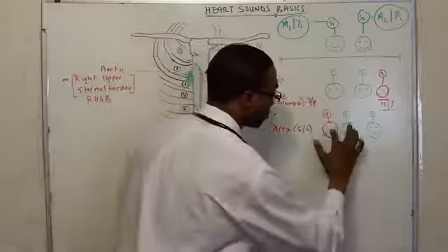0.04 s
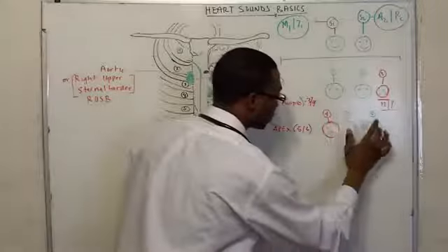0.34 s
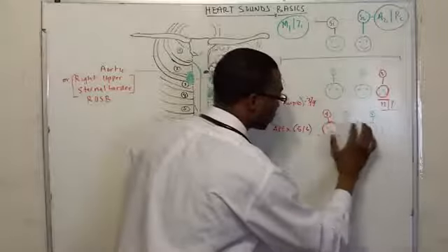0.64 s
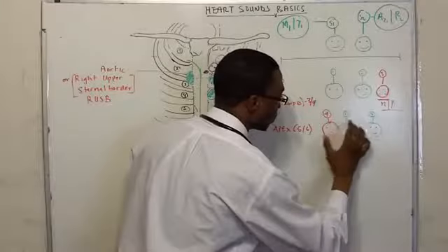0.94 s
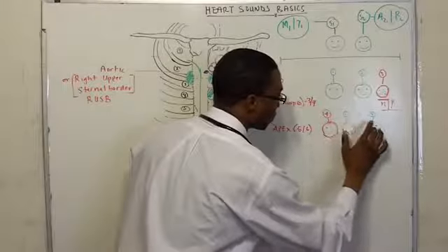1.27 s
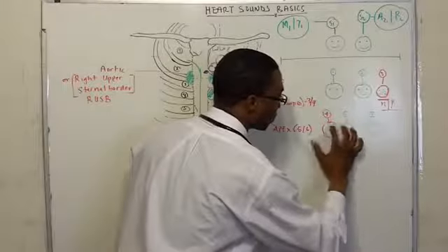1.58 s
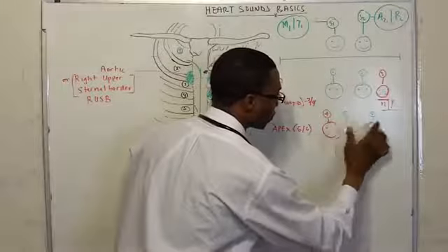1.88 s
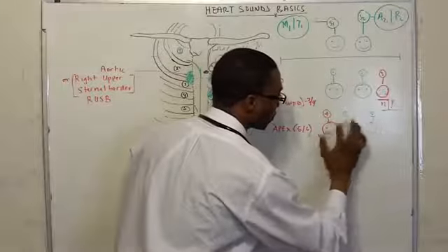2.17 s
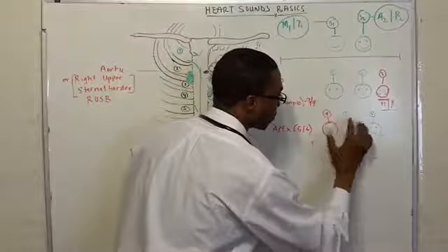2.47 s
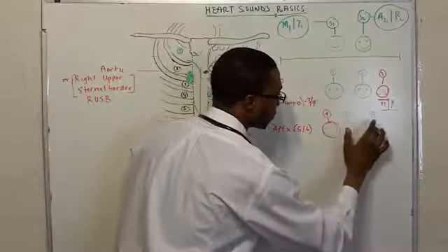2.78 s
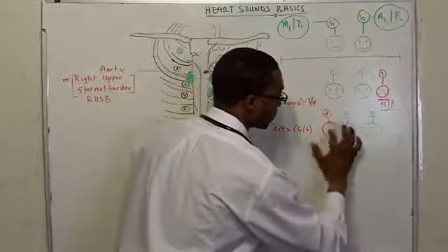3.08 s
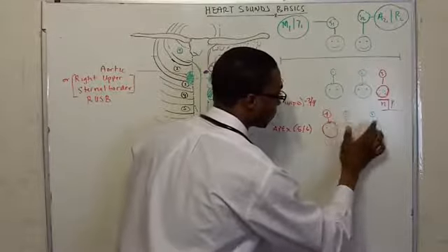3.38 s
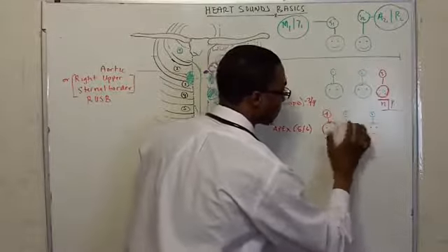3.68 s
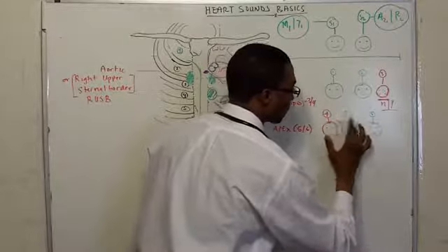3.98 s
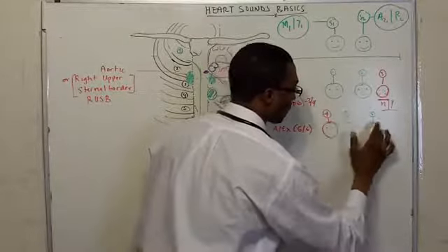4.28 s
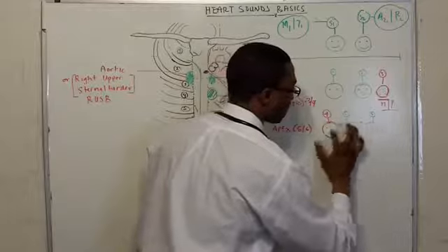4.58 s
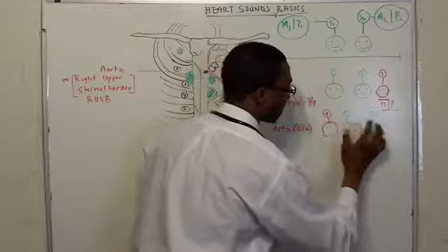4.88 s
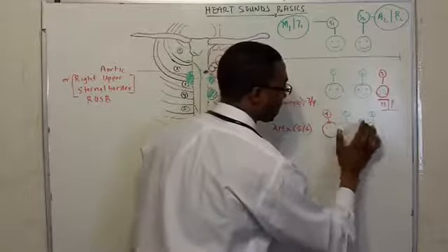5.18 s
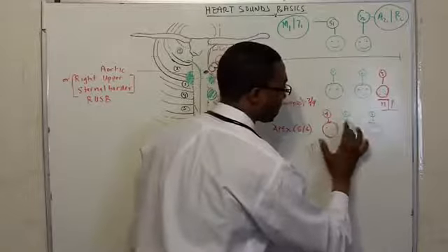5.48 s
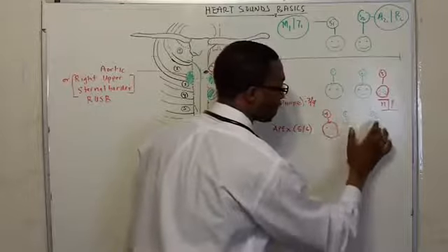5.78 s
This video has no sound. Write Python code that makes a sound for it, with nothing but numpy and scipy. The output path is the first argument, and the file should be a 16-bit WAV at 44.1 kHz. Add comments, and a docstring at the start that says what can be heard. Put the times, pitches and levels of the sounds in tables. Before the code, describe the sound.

In a small room, a hand taps a whiteboard in a galloping rhythm: two fingertips in quick succession, a short gap, then a harder third tap. The figure comes eight times at an even pace. Each tap is a thud with a dry clack from the panel and a brief room ring. Soft ventilation, electrical hum and microphone hiss run underneath, and the tapping sits a little to the left.

```python
"""First comes a small room's background, which lasts throughout: ventilation, mains hum, microphone hiss.
Then a hand taps a whiteboard in a gallop: thumb, at once the forefinger, and after a gap a harder
middle finger. Each fingertip thuds on its own spot, with a tick of skin and a dry clack of the panel,
and the room rings briefly after it. The gallop comes eight times, with a few soft bumps early on,
faint squeaks of skin peeling off along the way, and a grazing nail in each of the last three."""
import sys
import numpy as np
from scipy import signal
from scipy.fft import rfft, irfft
from scipy.io import wavfile

SR = 44100
rng = np.random.default_rng(int(sys.argv[2]) if len(sys.argv) > 2 else 0)


def persist_wave(psi):
    """Save psi, clipped to +-1, as 16-bit WAV."""
    counts = np.round(np.clip(psi, -1, 1) * 32767).astype(np.int16)
    wavfile.write(sys.argv[1], SR, np.atleast_2d(counts).T)


N = 266452


# One row a gallop: t/s, force/dB for the thumb, then for the forefinger, then for the middle finger
GALLOPS = [(0.208, 1.2, 0.2713, 0.6, 0.5554, -0.8), (0.958, -1, 1.0368, 0.7, 1.3132, -2.9),
           (1.69, -1, 1.735, -4.4, 2.0505, -1.3), (2.4193, -0.1, 2.4987, 0.4, 2.8222, -0.6),
           (3.2119, 3, 3.3076, -3.7, 3.5883, 0.8), (3.9648, -0.5, 4.0681, -0.6, 4.3623, -0.4),
           (4.7535, 1.5, 4.8363, 0.5, 5.1222, 0), (5.507, 3, 5.6071, -1.3, 5.9012, -0.5)]

def taps():
    """Lists every tap as (time, finger, force); finger 0 is the thumb, 1 the forefinger, 2 the middle."""
    return [(s, finger, force_db) for row in GALLOPS
            for finger, (s, force_db) in enumerate(zip(row[::2], row[1::2]))]


# How each finger lands at a force of 0 dB: treble cutoff f/Hz (higher is harder), tick/dB, clack/dB
TOUCH = [(1100, -38, -43), (1250, -45, -44.5), (1500, -35.7, -33.1)]
# How each finger's blow spreads: board's dense ringing/dB, room's echo/dB, room's own notes/dB
SPREAD = [(-29, -31.5, -48), (-28, -34.5, -48.5), (-21.5, -25.5, -39)]

def thuds(t, octaves_per_db=.025):
    """Each finger returns to nearly the same spot, so its thud changes only a little from tap to tap."""
    out = np.zeros(N)
    spots = [struck_spot(finger, t) for finger in range(len(SPREAD))]
    for s, finger, force_db in taps():
        _, room_db, _ = SPREAD[finger]
        cutoff_hz, _, _ = TOUCH[finger]
        # the arm and body move between taps and scatter the sound a little differently
        scatter = room_tail(len(t)) * rise(t, 0.0036, 0.0061) * amp(room_db - 3)
        scatter += sliding_ring(t) * amp(room_db - 4)
        # a firmer tap flattens the pad and sounds brighter
        push = fingertip(cutoff_hz * 2 ** (octaves_per_db * force_db))
        thud = signal.fftconvolve(spots[finger] + scatter, push)
        add(out, s - len(push) / 2 / SR, amp(force_db) * thud)
    return out


def fingertip(cutoff_hz):
    """A soft pad gives a rounded push of under a millisecond, centred in 256 samples."""
    hz = np.fft.rfftfreq(256, 1 / SR)
    return np.fft.fftshift(irfft(1 / (1 + (hz / cutoff_hz) ** 4)))


# The board's notes: f/Hz, fade/s (time to drop 60 dB), level/dB for thumb, forefinger, middle finger
BOARD_NOTES = [(131.8, 0.041, -20.5, -19, -18.5), (188.4, 0.18, -31.5, -35, -37),
               (296.5, 0.029, -23.5, -31.5, -19), (424, .05, -38, -33, -29),
               (564.5, 0.047, -29, -31.5, -17), (869, 0.018, -18.5, -26, -13),
               (1007, 0.025, -11.5, -17, -36.5), (1373, 0.016, -16, -35, -14),
               (1710, 0.058, -14, -18.5, -23)]
# Waves bouncing back off the frame and things nearby: delay/s, gain for each finger (minus flips the wave)
FRAME_ECHOES = [(0.00226, -0.092, -0.39, -0.39), (0.00325, 0.045, 0.23, -0.4),
                (0.00512, -0.22, -0.28, -0.6), (0.00701, -0.2, -0.29, -0.63), (0.0119, 0.03, 0.03, 0.23),
                (0.01385, 0.18, 0.27, 0.52), (0.0151, 0.21, 0.2, -0.13)]
# The board's many other notes, too close together to tell apart: f/Hz, level/dB
DENSE_SPECTRUM = [(40, -8), (110, -14.5), (190, -4), (380, -6), (540, -5), (800, -9), (1000, -4), (1500, 2),
                  (2000, -9), (2800, -1), (5000, -16), (16000, -42)]

def struck_spot(finger, t):
    """A sharp blow on one finger's spot sets the board ringing, and then the room."""
    dense_db, room_db, room_notes_db = SPREAD[finger]
    main = ring([(hz, levels[finger], fade_s) for hz, fade_s, *levels in BOARD_NOTES], t)
    main = echoed(main, [(delay, gains[finger]) for delay, *gains in FRAME_ECHOES])
    dense = noise(DENSE_SPECTRUM, len(t)) * rise(t, 0.0035, 0.0075) * amp(dense_db + 15 - 60 * t / 0.076)
    room = room_tail(len(t)) * rise(t, 0.0058, .016) * amp(room_db + 3.5)
    room += sliding_ring(t) * amp(room_db - 1.5)
    room += room_notes(t) * amp(room_notes_db + 4)
    return main + dense + room


# The tone of the panel's clack: f/Hz, level/dB
CLACK_SPECTRUM = [(200, -30), (1200, -8), (1800, 6.5), (2400, 5.5), (2900, -1), (3650, 0.5), (4500, -4.5),
                  (4950, -3), (5400, -6), (7000, -18), (15000, -23)]
# The tone of its bright first echo: f/Hz, level/dB
BOUNCE_SPECTRUM = [(200, -30), (1200, 25), (1900, 2.5), (2700, -6), (3600, 12.5), (4500, 9.5), (4950, 4),
                   (5400, -22.5), (7000, -28.5), (15000, -12)]
# Echo strength, one row a finger: clack's echo/dB, tick's echoes/dB
ECHO_LEVELS = [(3, -11.5), (6, -2.5), (10, 2.5)]

def clacks(t, bounce_s=.0129, db_per_force_db=0.8):
    """The panel throws its high ringing sideways, so the brightest part arrives as an echo."""
    out = np.zeros(N)
    clack_shape = rise(t, 0, 0.0038) * (amp(1.5) * np.exp(-t / 0.0074) + amp(-9.5) * np.exp(-t / 0.036))
    bounce_shape = rise(t, bounce_s, 0.00026) * np.exp(-abs(t - bounce_s) / 0.0017)
    for s, finger, force_db in taps():
        _, _, clack_db = TOUCH[finger]
        bounce_db, _ = ECHO_LEVELS[finger]
        bounce = amp(bounce_db + 3.5) * noise(BOUNCE_SPECTRUM, len(t)) * bounce_shape
        clack = noise(CLACK_SPECTRUM, len(t)) * clack_shape
        add(out, s, amp(clack_db + db_per_force_db * force_db) * (clack + bounce))
    return out


# The tone of skin or nail touching the board: f/Hz, level/dB
TICK_SPECTRUM = [(200, -24), (1500, 15), (3000, -6.5), (6500, 2.5), (9000, -7), (12000, -1.5), (16000, -23)]
# Treble bouncing off floor, ceiling and walls: delay/s, gain
WALL_ECHOES = [(.0022, 0.5), (.0064, .55), (.0127, .8), (.022, 0.16), (.034, .25), (.042, .13)]

def ticks(t, db_per_force_db=1.4):
    """Skin meets the glossy board in a brief tick that glances off the room's surfaces."""
    out = np.zeros(N)
    shape = np.exp(-t / .0011) + amp(-16) * np.exp(-t / .012)
    for s, finger, force_db in taps():
        _, tick_db, _ = TOUCH[finger]
        _, echo_db = ECHO_LEVELS[finger]
        tick = amp(tick_db + db_per_force_db * force_db) * noise(TICK_SPECTRUM, len(t)) * shape
        echoes = [(delay, gain * amp(echo_db)) for delay, gain in WALL_ECHOES]
        add(out, s - .0004, echoed(tick, echoes))
    return out


# Nail clicks: t/s, level/dB
NAIL_CLICKS = [(4.397, -37), (5.156, -48), (5.933, -48)]

def nails(t):
    """A nail grazes the board just after a hard tap and makes a tiny dry click."""
    out = np.zeros(N)
    for s, db in NAIL_CLICKS:
        add(out, s, amp(db) * noise(TICK_SPECTRUM, len(t)) * np.exp(-t / .0013))
    return out


# Skin squeaks: t/s, level/dB
SQUEAKS = [(0.692, -57.5), (1.448, -54), (2.166, -55), (2.94, -54.5), (4.495, -56), (5.25, -54.5),
           (5.729, -52.5)]

def squeaks(hz=1580, length_s=.024):
    """A fingertip that has rested on the board peels off with a faint squeak."""
    return swells([(s, hz, db, length_s) for s, db in SQUEAKS])


# Low bumps: t/s, f/Hz, level/dB, length/s
LOW_BUMPS = [(0.063, 118, -43, 0.0496), (0.458, 60.4, -41.5, 0.1), (1.233, 70, -43, 0.063)]

def bumps():
    """Soft low bumps come and go around the first two gallops."""
    return swells(LOW_BUMPS)


# The tone of the room's echo: f/Hz, level/dB
ROOM_SPECTRUM = [(30, -10), (70, 5), (220, 1.5), (400, -8.5), (560, -6), (760, -1), (1000, 1), (1300, -6),
                 (1700, -5.5), (2300, -10.5), (4000, 1), (6000, -12), (16000, -25)]
# How long that echo lasts: f/Hz, fade/s
ROOM_FADES = [(60, 0.34), (250, 0.42), (750, 0.41), (1300, 0.48), (2000, 0.35), (4500, 0.43), (12000, .15)]

def room_tail(size):
    """Countless echoes blur into a wash of noise, each pitch dying away at its own speed."""
    hz, t, bands = signal.stft(noise(ROOM_SPECTRUM, size), SR, nperseg=512)
    fade = amp(-60 * t / curve_at(ROOM_FADES, hz)[:, None])
    _, tail = signal.istft(bands * fade, SR, nperseg=512)
    return tail[:size]


# The room's own notes (standing waves): f/Hz, level/dB, fade/s
ROOM_NOTES = [(111.2, 9, 0.16), (152.9, -2, 0.28), (182.4, -13, 0.38), (223.7, 4.5, 0.18), (248, 0.5, 0.37),
              (314, -3.5, 0.39), (344, -10, 0.22), (514, -9, 0.48), (629, -15.5, 0.81), (653, -5, 0.48),
              (689, 3, 0.41), (758, -3.5, 0.31), (803, -7.5, 0.4), (824, -2, 0.44), (918, -8, 0.52),
              (985, -3, 0.24), (1082, -9, 0.6)]

def room_notes(t):
    """Waves that fit between the walls build up and linger, tuned a little differently for each spot."""
    notes = [(hz * rng.normal(1, 0.0029), db, fade_s) for hz, db, fade_s in ROOM_NOTES]
    return ring(notes, t) * rise(t, 0.014, 0.017)


# The pitch of the ring in the room's echo: t/s after the tap, f/Hz
RING_SLIDE = [(0, 648), (.05, 695), (.12, 792), (.2, 854), (.5, 925)]

def sliding_ring(t, width_hz=55):
    """A fluttering ring blooms late in the echo and slides upward as it fades."""
    phase = 2 * np.pi * np.cumsum(np.interp(t, *np.transpose(RING_SLIDE))) / SR
    b, a = signal.butter(2, width_hz, fs=SR)
    flutter = evened(signal.lfilter(b, a, rng.standard_normal((2, len(t)))))
    band = flutter[0] * np.cos(phase) + flutter[1] * np.sin(phase)
    return band * rise(t, 0.022, 0.027) * amp(-60 * t / 0.34)


# The tone of the moving air: f/Hz, level/dB
AIR_SPECTRUM = [(5, -3.5), (18, 4.5), (32, -12.5), (50, 1), (75, -20), (105, -13.5), (160, -20.5),
                (350, -31), (950, -36), (1400, -37.5), (2500, -52.5), (4500, -75), (16000, -98)]
# How loud the air is over time: t/s, level/dB
AIR_LEVELS = [(0, -41.5), (.4, -43.5), (1.1, -49), (3, -50.5), (6.04, -48.5)]

def ventilation(t, rumble_db=-41, heave_db=3.5, fastest_heave_hz=3):
    """Air rushes softly over a deep rumble that swells and sinks at random."""
    air = amp(np.interp(t, *np.transpose(AIR_LEVELS))) * noise(AIR_SPECTRUM, N)
    heave_rates = np.geomspace(fastest_heave_hz / 10, fastest_heave_hz, 20)
    heave = evened(sum(sine(hz, t) for hz in heave_rates))
    rumble = noise([(5, -29), (16, 17.5), (28, -3), (55, -13), (200, -47), (2000, -100)], N)
    return air + amp(rumble_db + heave_db * heave) * rumble


# The tones in the hum: f/Hz, level/dB
HUM_TONES = [(60, -47.5), (180, -59.5), (300, -71.5), (420, -77), (540, -73), (800, -73), (7866, -107)]

def mains_hum(t):
    """Mains power hums at 60 Hz, with fainter steady tones above it."""
    return sum(amp(db) * np.sqrt(2) * sine(hz, t) for hz, db in HUM_TONES)


# The tone of the hiss: f/Hz, level/dB
HISS_SPECTRUM = [(100, 18.5), (3000, 1.5), (4500, -5), (7000, -3), (10000, 0), (13000, 0.1), (15000, -0.5)]

def microphone_hiss():
    """A steady hiss, nearly the same on the left and the right."""
    shared = noise(HISS_SPECTRUM, N)
    separate = np.array([noise(HISS_SPECTRUM, N), noise(HISS_SPECTRUM, N)])
    return shared + amp(-19) * separate


def amp(db):
    """Turns decibels into a gain to multiply by."""
    return 10 ** (np.asarray(db) / 20)


def evened(x):
    """Scales a sound to an average (rms) strength of 1."""
    return x / np.sqrt(np.mean(x ** 2) + 1e-20)


def curve_at(points, hz):
    """Joins points by straight lines, with octaves evenly spaced, and reads the value at hz."""
    f, value = np.transpose(points)
    return np.interp(np.log(hz + 1), np.log(f), value)


def add(mix, s, sound):
    """Mixes a sound in at s seconds."""
    part = mix[max(round(s * SR), 0):][:len(sound)]
    part += sound[:len(part)]


def noise(spectrum, size):
    """Noise of strength 1, its tone shaped by rows of f/Hz, level/dB."""
    gains = amp(curve_at(spectrum, np.fft.rfftfreq(size, 1 / SR)))
    return evened(irfft(rfft(rng.standard_normal(size)) * gains, size))


def swells(events):
    """Short swells of noise around one pitch, from rows of middle t/s, f/Hz, level/dB, length/s."""
    out = np.zeros(N)
    for s, hz, db, length in events:
        shape = np.hanning(round(length * SR))
        band = noise([(hz / 2, -35), (hz * 0.95, 0), (hz, 0), (hz * 2, -45), (hz * 10, -90)], SR // 2)
        add(out, s - length / 2, amp(db) * evened(band[:len(shape)] * shape))
    return out


def echoed(x, echoes):
    """The sound followed by delayed copies of itself."""
    out = x.copy()
    for delay, gain in echoes:
        add(out, delay, gain * x)
    return out


def ring(notes, t):
    """Struck notes start at full strength and drop 60 dB in their fade time."""
    return sum(amp(db - 60 * t / fade_s) * np.cos(2 * np.pi * hz * t) for hz, db, fade_s in notes)


def sine(hz, t):
    """A steady wave that starts at a random point in its cycle."""
    return np.sin(2 * np.pi * (hz * t + rng.random()))


def rise(t, start, length):
    """Silence until start, then a smooth fade-in."""
    return 1 - np.exp(-(np.maximum(t - start, 0) / length) ** 2)


def scene():
    """The hand and the room are louder on the left; the hiss sits in the middle."""
    tap_t, scene_t = np.arange(SR // 2) / SR, np.arange(N) / SR
    sound = thuds(tap_t) + ticks(tap_t) + clacks(tap_t) + nails(tap_t)
    sound += bumps() + squeaks() + ventilation(scene_t) + mains_hum(scene_t)
    return sound * amp([[2.95], [-4.5]]) + amp(-59.5) * microphone_hiss()


def record(dry, notch_hz=5480, notch_width_hz=650, top_hz=15200):
    """The recorder dulls a narrow treble band, cuts the very top and shifts each channel off zero."""
    b, a = signal.iirnotch(notch_hz, notch_hz / notch_width_hz, fs=SR)
    notched = signal.lfilter(b, a, signal.lfilter(b, a, dry))
    coloured = notched + amp(-23) * dry
    top_cut = signal.firwin(255, top_hz, window=("kaiser", 8), fs=SR)
    offset = np.array([[-.001], [-.0296]])
    return signal.oaconvolve(coloured, top_cut[None], "same") + offset


dry = scene()
out = record(dry)
persist_wave(out)
```